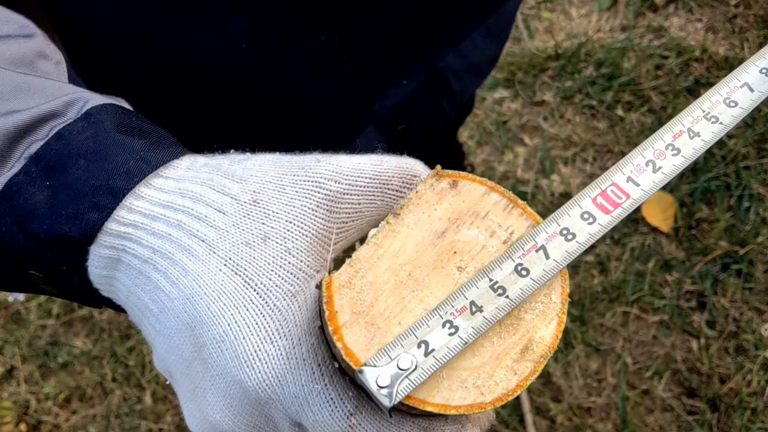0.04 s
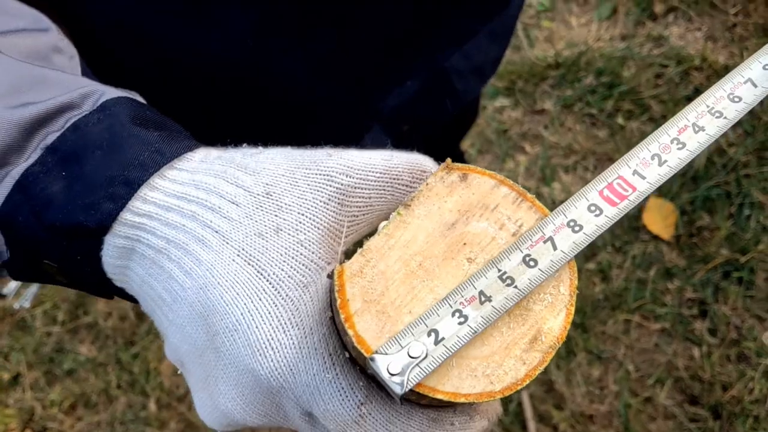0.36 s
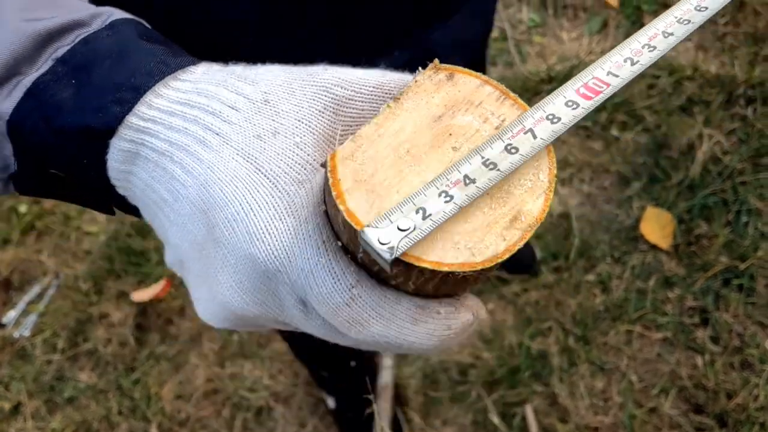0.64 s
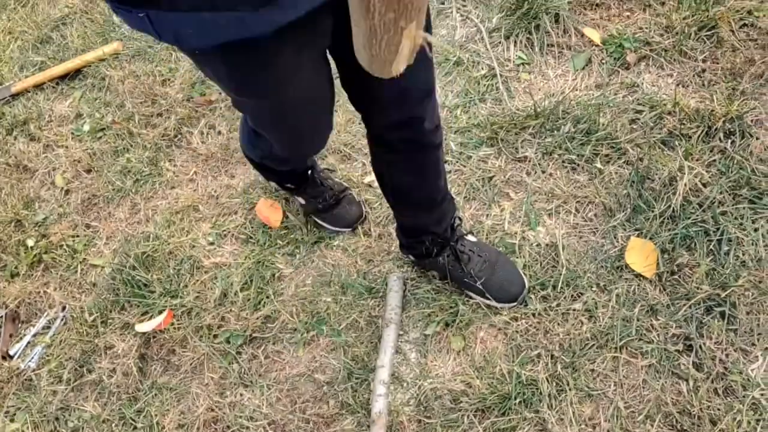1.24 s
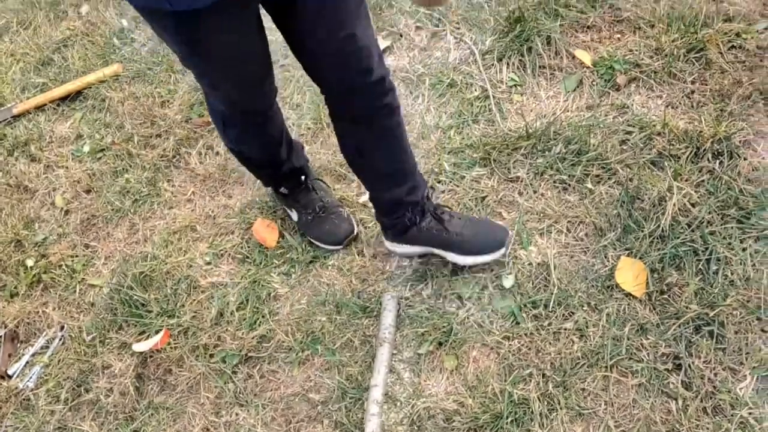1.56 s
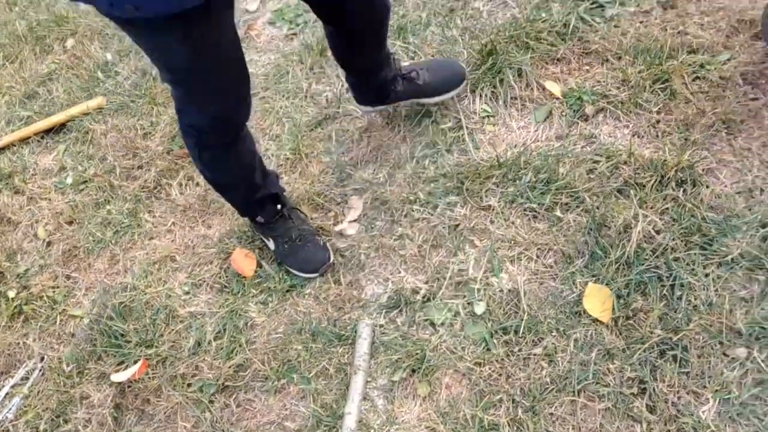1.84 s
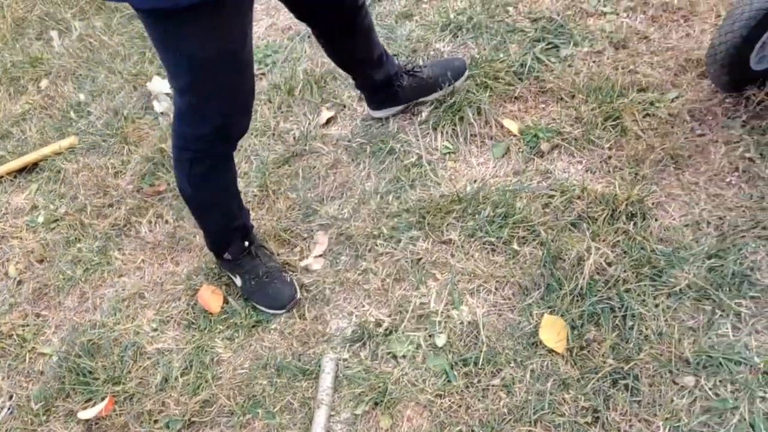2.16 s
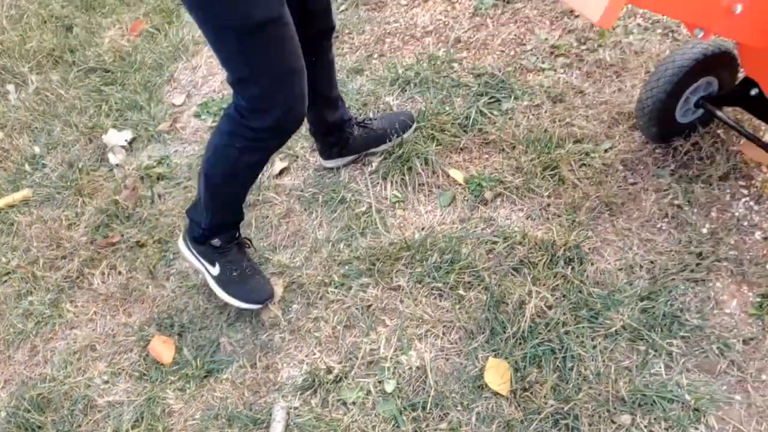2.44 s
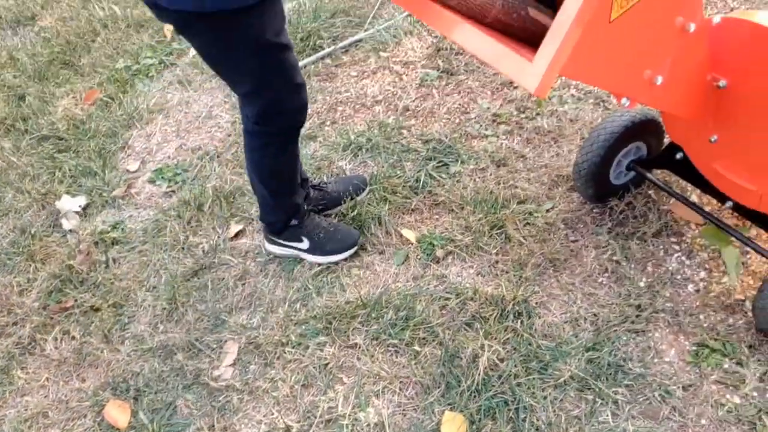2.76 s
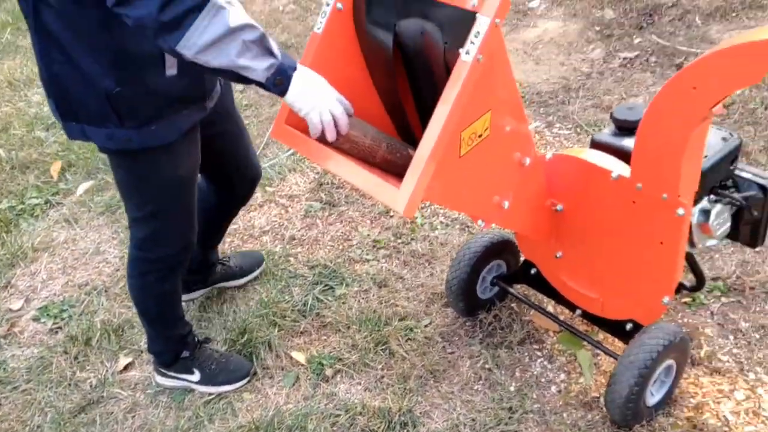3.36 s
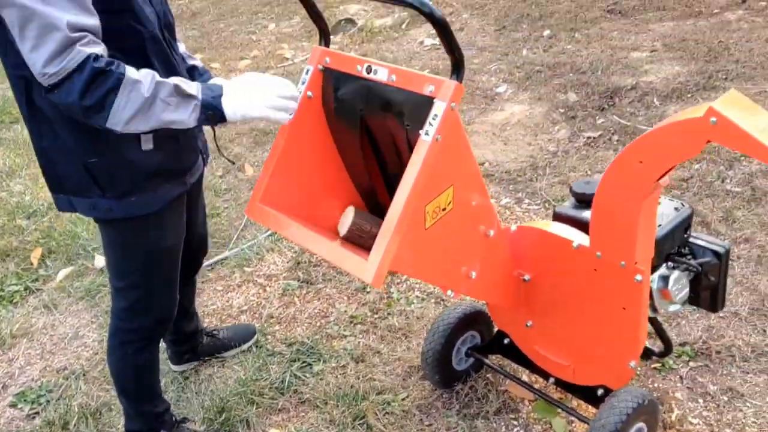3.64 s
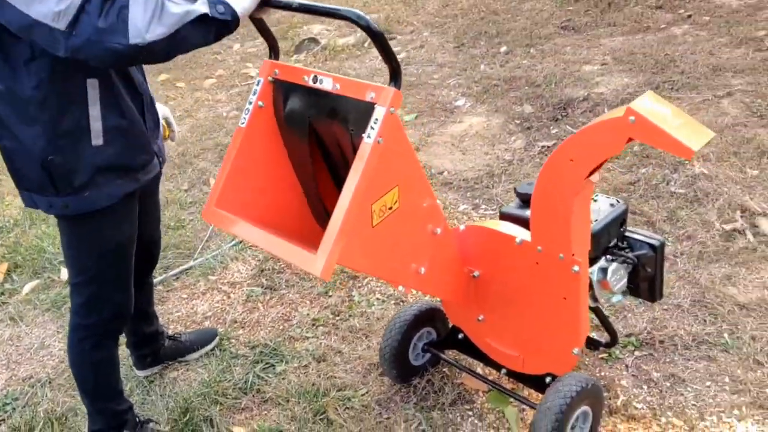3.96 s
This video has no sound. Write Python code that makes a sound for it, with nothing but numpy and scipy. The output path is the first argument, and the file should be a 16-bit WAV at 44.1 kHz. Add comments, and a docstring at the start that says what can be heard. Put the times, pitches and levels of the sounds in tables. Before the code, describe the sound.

A petrol wood chipper on a lawn fades in from silence between 0.1 and 0.4 seconds, followed by a soft, dull microphone bump. It runs at constant speed: a buzzing rotor drone, chopping air and a chute hiss that grows slightly, with the engine puttering underneath. Just before 4 seconds, at the very end, the blades bite a log with a bright crunch and crack while the drone dips.

```python
"""Wood chipper on a lawn

A petrol chipper at governed speed fades in quickly from silence. Its two-bladed rotor
drones and chops the air it blows, air hisses from the chute, and a four-stroke single putters
underneath. At the very end the blades bite into a log: a bright crunch, while the drone dips."""
import sys
import numpy as np
from scipy import signal
from scipy.fft import rfft, irfft
from scipy.io import wavfile

SR = 44100
rng = np.random.default_rng(int(sys.argv[2]) if len(sys.argv) > 2 else 0)


def wav_out(sig):
    """Save sig, one row per channel (or a flat mono array), as 16-bit PCM at SR to the path in sys.argv[1]."""
    wavfile.write(sys.argv[1], SR, np.round(np.clip(np.atleast_2d(sig).T, -1, 1) * 32767).astype(np.int16))


N = 176400
TIME, BINS = np.arange(N) / SR, np.maximum(np.arange(N // 2 + 1) * SR / N, 1)
BLADE_HZ = 125.11   # two blade passes per turn of the shaft

# The drone's strong partials: (multiple of the blade rate)
DRONE_ORDERS = (1, 2, 3, 4, 5, 6, 7, 8, 16)
# Their mix, shifting with the listener's place: (time [s], level of each partial [dB])
DRONE_LEVELS = [(0.45, -29, -18.5, -29.5, -44.0, -29.5, -34, -40, -38, -38),
                (0.7, -27.5, -18.5, -29.5, -42, -30, -34.5, -41, -37, -38.5),
                (0.95, -28, -18, -30.5, -43, -30.9, -34.5, -42, -39.5, -38.2),
                (1.15, -29.5, -17.5, -30, -53, -32.5, -33, -47, -43, -36),
                (1.35, -28.5, -17.5, -31, -50, -31.5, -30.5, -37.4, -55, -40),
                (1.55, -28.5, -18.7, -33.5, -58.3, -29.5, -33, -40, -44, -37),
                (1.8, -27.1, -18.5, -32, -49.9, -29, -30.5, -40.5, -42, -39),
                (2.1, -27.0, -18.5, -29.5, -45, -29, -34.5, -36.3, -42, -37.5),
                (2.4, -27, -19, -30, -37, -29, -30.7, -38, -45.0, -36.5),
                (2.7, -27, -18.5, -30.5, -38, -30, -34.5, -36, -41, -38),
                (2.95, -26.5, -19.4, -30.5, -41, -27.5, -34, -35, -59, -36.5),
                (3.2, -26.0, -19, -31, -45.9, -28.4, -33.2, -35, -58, -44),
                (3.45, -27, -18.5, -29.3, -41.0, -28.5, -34.5, -34.8, -61, -40),
                (3.65, -25, -18, -31, -39.6, -30.5, -36, -35.5, -38, -43),
                (3.85, -27, -19.2, -30.4, -37.7, -32, -44, -34, -39, -41)]
# Fainter partials on top: (multiple of the blade rate, level [dB])
DRONE_OVERTONES = {9:-44.5, 11:-41.5, 12:-49, 13:-53, 14:-48, 17:-55.5, 19:-46.5, 20:-51, 22:-59, 23:-56}

def rotor(angle):
    """Each blade pass is a pressure pulse, blunted by the ground echo; higher partials waver more."""
    skew_rad, echo_turn_rad, echo_null_hz = 0.87, 2.53, 510
    strong = list(zip(DRONE_ORDERS, in_time(DRONE_LEVELS)))
    out = 0
    for k, db in strong + list(DRONE_OVERTONES.items()):
        hz = k * BLADE_HZ
        trail = skew_rad * np.log(k) + echo_turn_rad * (hz > echo_null_hz)
        out = out + partial(k * angle - trail, hz, db, waver_db=0.17 + 0.0734 * k)
    return out


# Air colours, from dark rumble to bright hiss: (frequency [Hz], relative level [dB])
RUMBLE_COLOUR = [(20,-10),(40,-7),(70,-14),(110,-0.5),(170,0),(250,9.5),(340,-5.5),(420,-8),(600,-24),(1200,-53)]
RUSH_COLOUR = [(250,-35),(450,-9.5),(600,1.5),(790,-2.5),(900,2.5),(1100,-6),(1500,-25.5)]
CHOP_COLOUR = [(700,-23),(1050,-2.5),(1400,-1.5),(1600,-5),(2000,-1),(2600,-9.5),(3100,-23.5),(4500,-32)]
HISS_COLOUR = [(1500,-8),(2800,-2),(3700,-6),(4900,-0.5),(6800,-2.7),(8400,3),(9500,-9),(11700,-5),(13500,-8),(14800,-27),(15300,-61)]
# Fader moves for the air: (time [s], rush level [dB], chop level [dB], hiss level [dB])
AIR_LEVELS = [(.4,-37,-37.5,-36.5),(1.0,-36.5,-36.5,-34),(1.6,-38.5,-36,-34),(2.2,-33,-34.5,-33),(2.55,-35.5,-34.5,-31.5),(2.85,-34.5,-32.5,-31.5),(3.3,-33,-34,-30),(3.6,-33,-33,-31),(3.95,-32.5,-33,-30)]

def blown_air(angle):
    """Low rumble, a rush and a brighter chop that puff at each blade pass, and smoother chute hiss."""
    puff = np.cos(angle - 0.067)
    out = from_db(-36) * noise(RUMBLE_COLOUR)
    layers = [(RUSH_COLOUR, 0.25, 0.5), (CHOP_COLOUR, 0.13, 2.3), (HISS_COLOUR, 0.04, 0.5)]
    for (colour, puff_depth, flutter_db), db in zip(layers, in_time(AIR_LEVELS)):
        puffing = noise(colour) * rms_one(np.exp(puff_depth * puff))
        level_db = db + flutter_db * drift(64) + 0.69 * drift(3.9)   # fast flutter, slow sway
        out = out + puffing * from_db(level_db)
    return out


# The exhaust's putter: (multiple of the firing rate, level [dB])
EXHAUST_PARTIALS = {2:-54, 3:-45, 5:-41, 7:-42, 9:-39, 10:-42, 14:-50.5, 18:-44.5}
# Rings of the silencer and casing: (frequency [Hz], bandwidth [Hz], level [dB])
CASING_RINGS = [(189, 18, -40.5), (280, 99, -37), (318.5, 31, -40), (540, 57, -40), (1985, 400, -50),
                (2480, 190, -56)]

def engine(angle):
    """A firing every second turn: a pitched exhaust putter, and uneven knocks that ring the casing."""
    knock_s, silencer_smear_rad = 0.013, 0.5
    cycle, firing_hz = angle / 4, BLADE_HZ / 4
    out = sum(partial(k * cycle - silencer_smear_rad * k * k, k * firing_hz, db, waver_db=2.5)
              for k, db in EXHAUST_PARTIALS.items())
    since_firing_s = (cycle / (2 * np.pi) % 1) / firing_hz
    knocks = np.exp(-since_firing_s / knock_s)
    for hz, width_hz, db in CASING_RINGS:
        radius = np.exp(-np.pi * width_hz / SR)
        poles = [1, -2 * radius * np.cos(2 * np.pi * hz / SR), radius ** 2]
        ring = signal.lfilter([1, 0, -1], poles, knocks * rng.standard_normal(N))
        out = out + from_db(db) * ears(hz) * rms_one(ring)
    return out


# Broad, bright colour of tearing wood: (frequency [Hz], relative level [dB])
CRUNCH_COLOUR = [(60,-28),(200,-5),(600,0),(1200,1),(1550,0),(1900,5),(2400,-0.5),(3100,-8),(4200,-0.5),(6000,-5),(8200,3),(10000,-5.5),(12000,-13.5),(15500,-14)]

def log_bite():
    """Fibres tear in a wash of noise, with one hiss-coloured crack as the wood splits."""
    split_s, split_width_s = 3.973, 0.0048
    tearing = from_db(-17) * noise(CRUNCH_COLOUR)
    burst = np.exp(-((TIME - split_s) / split_width_s) ** 2)
    crack = from_db(-16.5) * noise(HISS_COLOUR) * burst
    return tearing + crack


# Colour of the valve gear's buzz: (frequency [Hz], level per partial [dB])
BUZZ_COLOUR = [(800,-64),(1050,-49.5),(1300,-51.5),(1600,-63),(1950,-52.5),(2200,-66.5),(2800,-51)]

def valve_buzz(angle):
    """Ticks repeating with each turn of the shaft fill the gaps between the blade partials."""
    out = 0
    for k in np.arange(6, 23) + 0.5:   # odd multiples of the shaft speed
        hz = k * BLADE_HZ
        phase = k * angle + rng.uniform(0, 2 * np.pi)
        out = out + partial(phase, hz, at_hz(BUZZ_COLOUR, hz), waver_db=3)
    return out


# Soft, bassy colour of the bump: (frequency [Hz], relative level [dB])
THUMP_COLOUR = [(50,-22),(105,0),(170,0),(300,-9),(700,-44)]

def handling_thump():
    """A dull bump, as of a hand shifting on the microphone."""
    start_s, decay_s = 0.398, 0.054
    envelope = (TIME > start_s) * np.exp(-np.abs(TIME - start_s) / decay_s)
    return from_db(-22.5) * noise(THUMP_COLOUR) * envelope


def partial(phase, hz, level_db, waver_db):
    """One wavering tone, reaching the right ear a little later."""
    housing_delay_s = 2e-5 + 4.5e-7 * hz   # the housing holds higher partials back longer
    ear_delay_s = np.array([[0], [0.00013]])
    lag = 2 * np.pi * hz * (housing_delay_s + ear_delay_s)
    amplitude = np.sqrt(2) * from_db(level_db + waver_db * drift(9.8))
    return amplitude * ears(hz) * np.cos(phase - lag)


# How alike the two ears sound: (frequency [Hz], likeness [correlation once clipped to -1..1])
EAR_LIKENESS = [(30,-1),(120,4.5),(300,-0.8),(600,0.4),(1200,-0.13),(2400,0.07),(5000,0),(12000,0)]

def noise(colour):
    """Stereo turbulence of a given colour at unit power, wide in the treble."""
    mid, side = rfft(rng.standard_normal((2, N)))
    alike = np.clip(at_hz(EAR_LIKENESS, BINS), -1, 1)
    pair = np.sqrt(1 + alike) * mid + np.sqrt(1 - alike) * side * [[1], [-1]]
    return rms_one(irfft(pair * ears(BINS) * from_db(at_hz(colour, BINS)), N))


# Panning, mostly a little to the right: (frequency [Hz], left minus right [dB])
EAR_BALANCE = [(100,1.5),(260,-0.5),(380,-1),(650,-2.5),(1000,-2.5),(1500,-5.5),(2000,-9),(2600,-1),(5000,-1),(8300,-2.5),(10500,-1.5),(13500,3)]

def ears(hz):
    """Left and right gains at these frequencies, of constant total power."""
    gains = from_db(np.array([[0.5], [-0.5]]) * at_hz(EAR_BALANCE, hz))
    return gains / np.sqrt(np.mean(gains ** 2, axis=0))


def drift(rate_hz):
    """A smooth random wander at unit power, mostly slower than the given rate."""
    spectrum = rfft(rng.standard_normal(N)) / (1 + (BINS / rate_hz) ** 2)
    return rms_one(irfft(spectrum, N))


def from_db(db):
    """Decibels to gain."""
    return 10 ** (np.asarray(db) / 20)


def rms_one(x):
    """Scale to unit power."""
    return x / np.sqrt(np.mean(x ** 2) + 1e-20)


def in_time(rows):
    """Each column of a timed table as a curve over every sample."""
    times, *columns = np.transpose(rows)
    return [np.interp(TIME, times, column) for column in columns]


def at_hz(points, hz):
    """Read a table on a log-frequency axis."""
    frequencies, values = np.transpose(points)
    return np.interp(np.log(hz), np.log(frequencies), values)


def scene():
    """One shaft drives rotor, engine and air; the drone ducks under the bite."""
    bite_s, bite_rise_s, duck_db = 3.959, 0.005, -4
    jitter_s = 2e-5 * drift(4.3)
    angle = 2.404 + 2 * np.pi * BLADE_HZ * (TIME + jitter_s)   # one full circle per blade pass
    biting = np.clip((TIME - bite_s) / bite_rise_s, 0, 1)
    drone = rotor(angle) * from_db(duck_db * biting)
    machine = drone + engine(angle) + valve_buzz(angle) + blown_air(angle)
    return machine + handling_thump() + biting * log_bite()


# The fade-in, silent before its first point: (time [s], gain [linear])
FADE_IN = [(.137,0.13),(.2,0.34),(.3,0.79),(.4,1)]

def record(dry):
    """The microphone port notches the treble; the sound fades in, bass last, and the top is cut."""
    bass_cut_hz, notch_hz, top_hz = 156, 9540, 15700
    start_s, bass_opens_s, bass_rise_s = 0.137, 0.43, 0.033
    thin = signal.sosfilt(signal.butter(1, bass_cut_hz, "high", fs=SR, output="sos"), dry)
    opened = np.clip((TIME - bass_opens_s) / bass_rise_s, 0, 1)
    filled = thin + opened * (dry - thin)
    notched = signal.lfilter(*signal.iirnotch(notch_hz, Q=7.6, fs=SR), filled)
    fade = in_time(FADE_IN)[0] * (TIME > start_s)
    top_cut = signal.ellip(10, 0.1, 90, top_hz, fs=SR, output="sos")
    return signal.sosfilt(top_cut, notched * fade)


dry = scene()
out = record(dry)
wav_out(out)
```